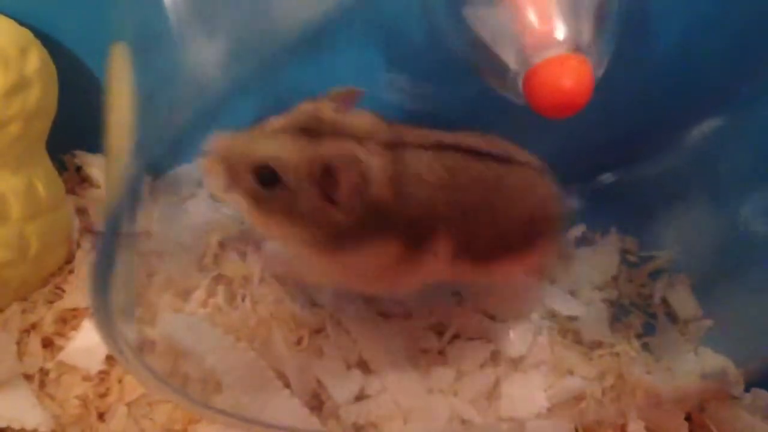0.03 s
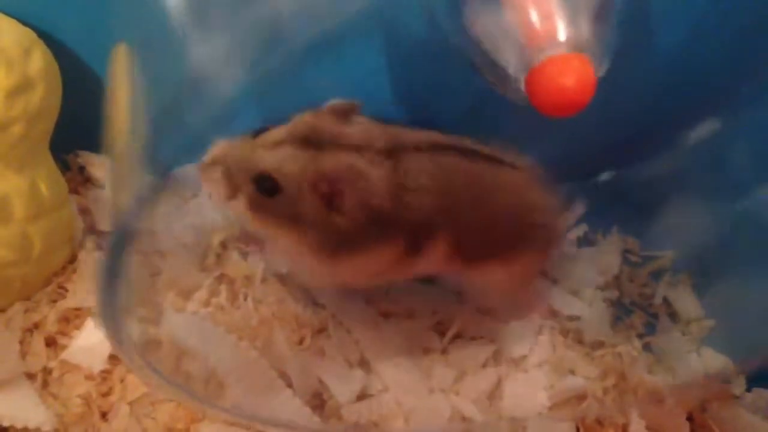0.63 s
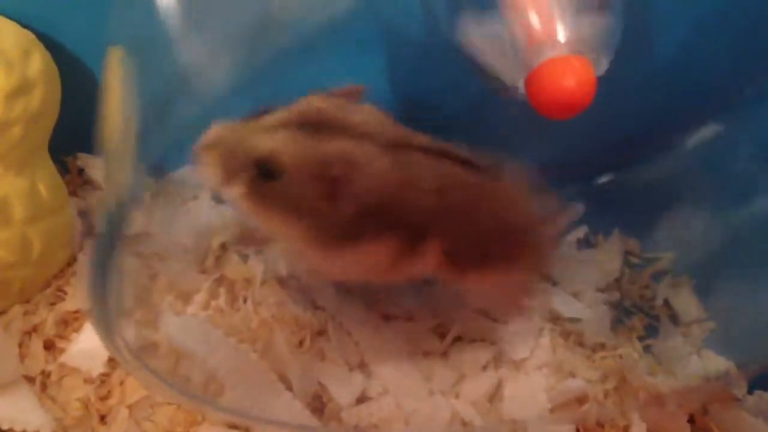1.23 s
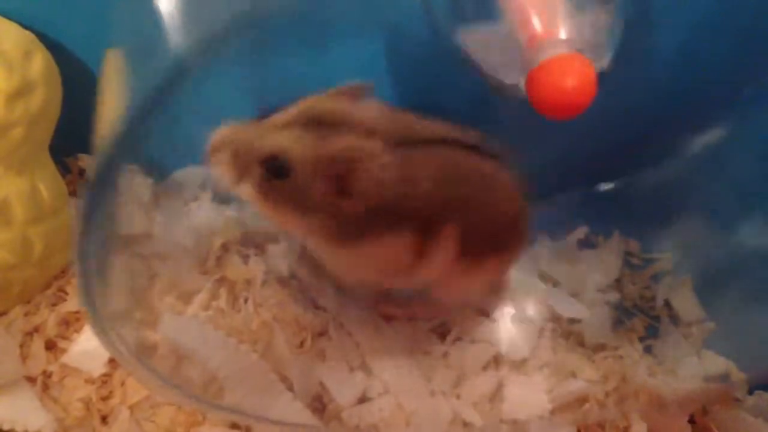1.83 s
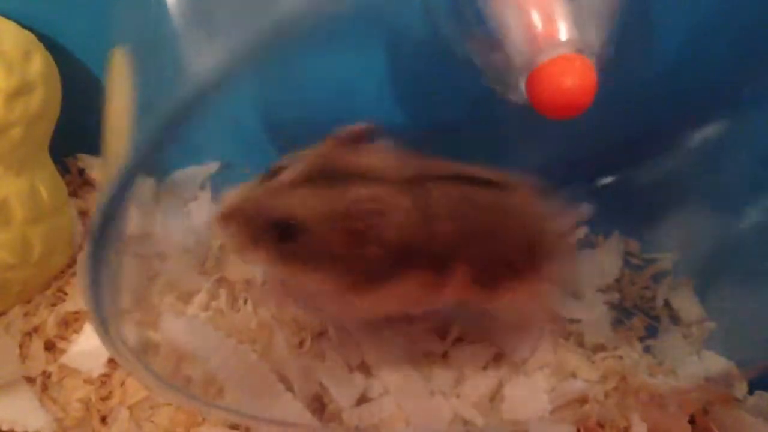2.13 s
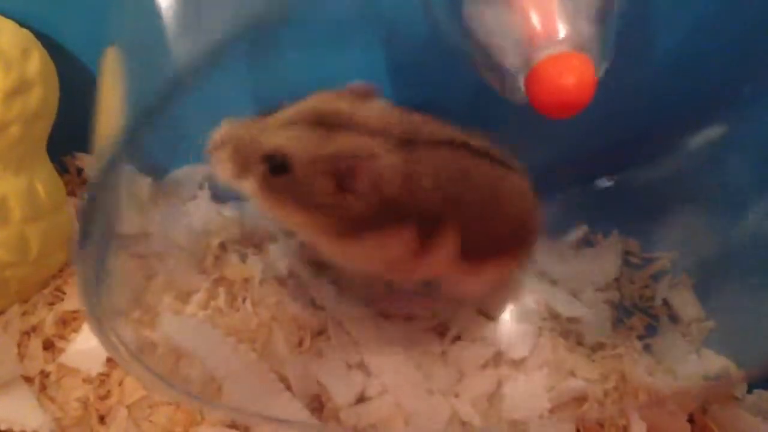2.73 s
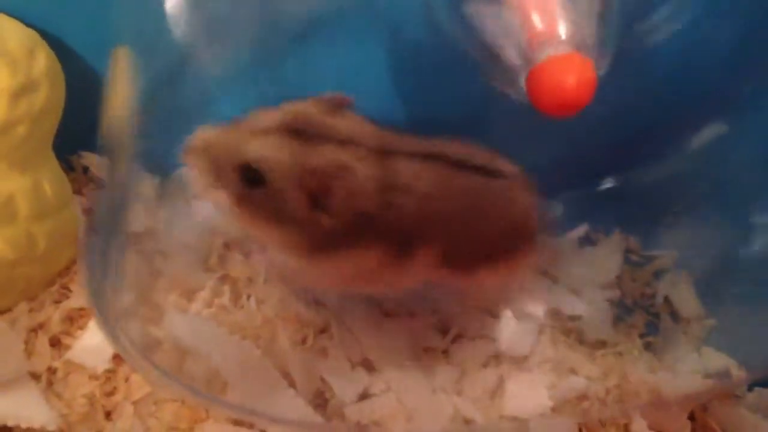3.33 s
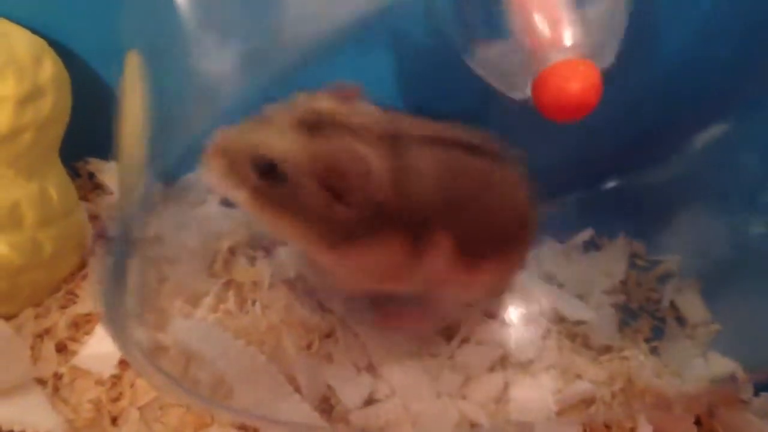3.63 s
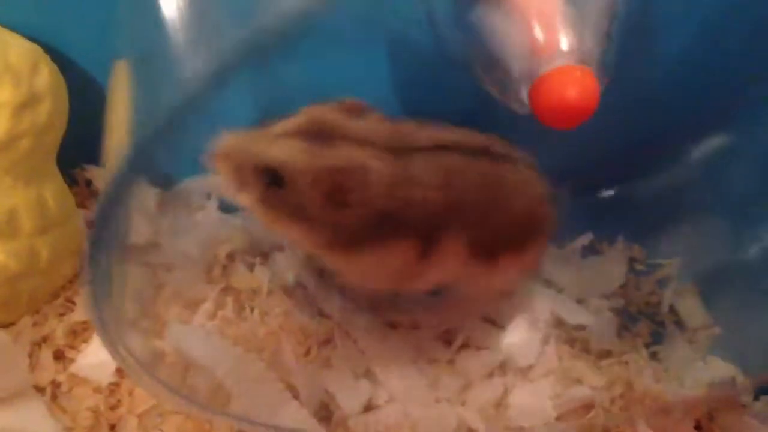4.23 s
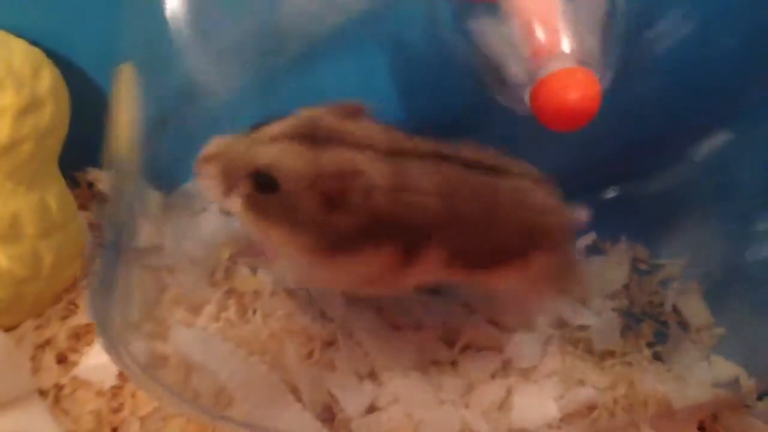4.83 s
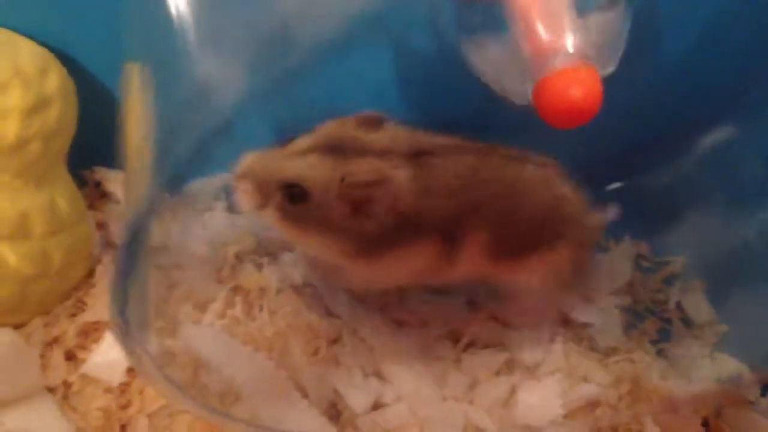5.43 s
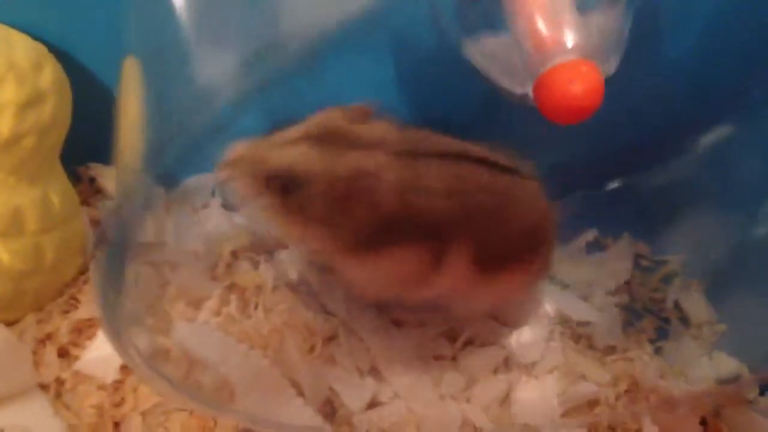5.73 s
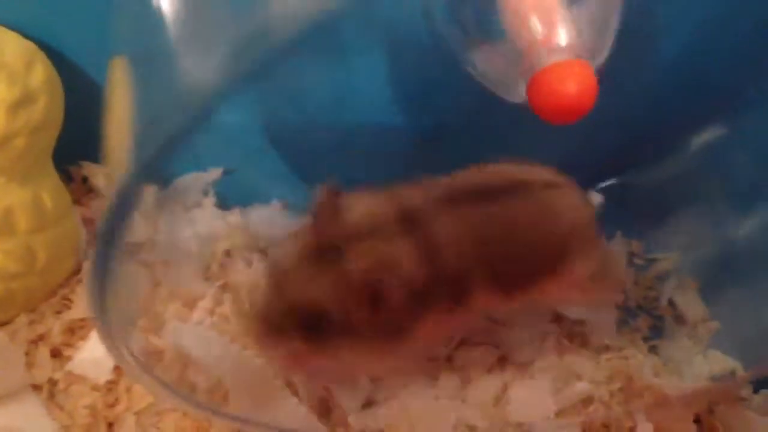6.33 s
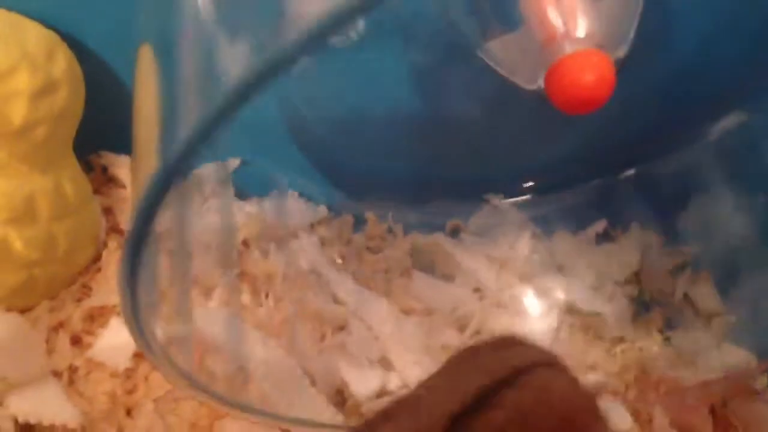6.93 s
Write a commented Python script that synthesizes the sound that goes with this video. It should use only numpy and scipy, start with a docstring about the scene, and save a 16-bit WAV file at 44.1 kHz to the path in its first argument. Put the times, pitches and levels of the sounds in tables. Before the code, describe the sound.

A hamster runs in a rattling plastic wheel with quick thuds and brief axle squeaks, then slows to a stop.

```python
"""A hamster runs in a plastic wheel inside its cage, close by, in a quiet room.
From the start, each quick step thuds on the drum and throws the loose hub against the axle, while
the drum rumbles, the dry axle chirps and scrapes, claws scuff and tick, and bedding rustles.
From about halfway, shavings slide twice. Near the end the axle groans softly as the wheel slows;
the steps stop, and the wheel comes to rest over the room's faint hush."""
import sys
import numpy as np
from scipy import signal
from scipy.io import wavfile
from scipy.ndimage import uniform_filter1d

SR = 44100
rng = np.random.default_rng(int(sys.argv[2]) if len(sys.argv) > 2 else 0)


def store_wav(level_fs):
    """Save 16-bit WAV to argv[1]."""
    pcm = np.round(np.clip(np.atleast_2d(level_fs), -1, 1) * 32767)
    wavfile.write(sys.argv[1], SR, pcm.T.astype(np.int16))


N = 317079
TIME = np.arange(N) / SR
RATTLE_TRIM_DB = -4

# The turning wheel. Each row: time in seconds, relative levels of drum rumble and axle rattle in dB.
WHEEL_LEVELS = [(0, -25, -21), (0.08, -40, -48), (0.13, -29.5, -38), (0.85, -28, -37), (1.04, -37.5, -41),
                (1.2, -29, -37), (2.52, -29, -40), (2.61, -40, -41), (2.76, -27, -39), (2.92, -28, -39),
                (3.2, -31.5, -38.5), (3.42, -30, -38.5), (3.8, -30, -37.5), (4.68, -29, -38.5),
                (4.81, -35.5, -42), (4.9, -30.5, -38.5), (5.02, -32.5, -44), (5.3, -26.5, -35),
                (5.5, -36.5, -43), (5.92, -26.5, -36.5), (6.17, -34, -41), (6.28, -32.5, -40.5),
                (6.6, -28, -38), (6.84, -36.5, -45.5), (7.08, -42, -58), (7.19, -53, -67)]
# The drum's low body response. Each row: frequency in Hz, gain in dB.
DRUM_SPECTRUM = [(40, -22), (85, -42.5), (105, -19.5), (130, 0.5), (170, 1.5), (215, 1.5), (275, 3.5),
                 (315, 0), (370, -9.5), (420, -6), (560, -11), (680, -18.5), (1200, -22.5), (2000, -55.5)]
# The plastic's midrange response to small contacts. Each row: frequency in Hz, gain in dB.
WALL_SPECTRUM = [(60, -65), (300, -0.5), (550, -2.5), (780, 1), (1200, -0.5), (2200, -11), (3500, -17.5),
                 (5200, -18.5), (6600, -43), (8000, -38), (15000, -47)]


def hub_knocks(blows, rise_s=0.0024, chatter_s=0.0035, seat_s=0.0012, size=4096):
    """Impact excitation: the hub seats on the axle with a crack and a brief note; the wheel rings on."""
    # Each row: frequency in Hz, gain of the crack in dB.
    crack_spectrum = [(60, -40), (200, -34), (600, -0.5), (1100, 3.5), (1550, 3.5), (1900, -1.5),
                      (2200, 5.5), (2420, -10), (2650, 4), (2950, -8), (3400, -1), (4200, -17.5),
                      (5300, -14), (7000, -37), (15000, -47)]
    out, t, colour = np.zeros(N), TIME[:size], response(crack_spectrum)
    for s, db, hz, crack_db in blows:
        rise = rise_s * np.exp(0.33 * rng.uniform(-1.16, 1))
        hub = swell(t, rise) * np.sin(2 * np.pi * hz * t)
        note = peaked(hub + amp(-3) * peaked(wheel_ring(vary_db=6.0)))
        crack = burst(colour, chatter_s, size) * (1 - np.exp(-t / seat_s))
        add(out, s, amp(db) * (amp(-2.5) * note + amp(crack_db - 1) * crack))
    return out


def hub_blows(step_db=-29, spread_db=5, hub_hz=1484, spread_hz=86, rebound_s=0.029):
    """Inelastic collision: steps throw the hub, alternate ones harder, and it rebounds more softly."""
    # Prominent knocks. Each row: start in seconds, level in dB, pitch in Hz, crack emphasis in dB.
    loud_knocks = [(0.044, -22, 1463, -5), (0.194, -21, 1530, -9), (0.2688, -13.5, 1465, -26),
                   (0.3438, -9.5, 1463, -6.5), (0.3675, -18.5, 1500, -27), (0.4234, -12.5, 1520, -5),
                   (0.446, -21.5, 1426, -14), (0.502, -25, 1560, -14), (0.5700, -15, 1475, -2),
                   (0.587, -18.5, 1540, -14), (0.7183, -17, 1486, -23), (0.7517, -17, 1583, -6),
                   (0.7953, -23, 1460, 6), (0.808, -19.5, 1490, -13), (0.8661, -16, 1500, -10),
                   (1.1213, -19, 1540, -9), (1.1938, -17, 1474, -4), (1.218, -18.5, 1540, -18),
                   (1.342, -16.5, 1520, -7), (1.4125, -20, 1634, -7), (1.4775, -23.5, 1464, -3),
                   (1.489, -16.5, 1484, -12), (1.527, -21, 1544, -15), (1.582, -17.5, 1405, -14),
                   (1.6413, -17.5, 1470, -10), (1.8866, -16, 1465, -8), (1.952, -19.5, 1560, 1.5),
                   (1.976, -18.5, 1530, -3), (2.098, -17, 1533, -12), (2.2451, -17, 1440, -12),
                   (2.2837, -17, 1540, -10), (2.339, -18, 1505, -31), (2.478, -19.5, 1484, -14),
                   (2.646, -23, 1430, -19), (2.7896, -18.5, 1500, -4), (2.899, -22.5, 1420, -10),
                   (3.004, -21, 1516, -15), (3.039, -14.5, 1544, -15), (3.0871, -16.5, 1440, -3),
                   (3.1014, -12, 1530, -32), (3.237, -5, 1502, -2), (3.3875, -15.5, 1460, -3.5),
                   (3.4805, -14, 1600, -28), (3.5445, -14.5, 1490, -21), (3.58, -20.5, 1565, -18),
                   (3.6182, -14, 1520, -12), (3.688, -20.5, 1540, -13), (3.762, -9.5, 1476, -25),
                   (3.7942, -14.5, 1600, -19), (3.8425, -16, 1483, -6.5), (3.908, -24, 1520, -4),
                   (3.9866, -8.5, 1540, -6.5), (4.083, -20, 1475, -22), (4.1392, -14.5, 1467, -10),
                   (4.2947, -19, 1530, 2.5), (4.366, -17, 1514, -7.5), (4.4365, -15, 1507, -5.5),
                   (4.456, -25, 1500, -22), (4.513, -18.5, 1390, -22), (4.543, -15, 1553, -29),
                   (4.587, -13, 1536, -3.5), (4.656, -18, 1530, -24), (4.7372, -7, 1439, -7),
                   (4.8335, -18.5, 1450, -23), (4.90, -22, 1410, -4), (5.1279, -16, 1563, -5),
                   (5.2258, -14, 1527, -32), (5.2753, -8.5, 1524, -29), (5.3525, -18.5, 1475, -10),
                   (5.424, -25.5, 1454, -10), (5.533, -21.5, 1526, -10), (5.9577, -10.5, 1455, -0.5),
                   (6.1115, -21.5, 1505, -11), (6.1945, -23, 1534, -9), (6.2695, -14, 1450, -3.5),
                   (6.289, -26, 1510, -13), (6.448, -22, 1495, -24), (6.496, -24, 1540, 11),
                   (6.566, -29, 1500, 4), (6.8456, -25.5, 1530, -2), (6.908, -33, 1450, -20),
                   (6.991, -48, 1480, -6), (7.082, -44, 1500, -1)]
    light = []
    for k, s in enumerate(steps()):
        softness, crack, late, rebound_softness, tuning = np.clip(rng.standard_normal(5), -2, 2)
        db = step_db + effort(s) + (-1) ** k
        hz = hub_hz + spread_hz * tuning
        light.append((s, db - spread_db * softness, hz, -11 + 5 * np.tanh(crack)))
        light.append((s + rebound_s + 0.007 * late, db - 5 - spread_db * rebound_softness, hz, -18))
    return among(loud_knocks, light)


def wheel_ring(vary_db, detune_hz=14, build_s=0.0047, size=4096):
    """Modal superposition: each contact point weights and tunes the wheel's damped modes differently."""
    # Each row: frequency in Hz, relative level in dB, 60 dB decay time in seconds.
    wheel_modes = [(569.5, -0.5, 0.059), (926, 3, 0.028), (1427, 22.5, 0.016), (1470, 18.5, 0.025),
                   (1500, -19, 0.16), (1588, 4, 0.042), (2135, -6, 0.023), (2663, 5.5, 0.027),
                   (3280, -7.5, 0.056), (4305, -10, 0.026), (4900, -30.5, 0.011), (6470, -29, 0.059)]
    hz, db, t60 = np.transpose(wheel_modes)[:, :, None]
    t = TIME[:size]
    hz = hz + detune_hz * rng.standard_normal(hz.shape)
    envelopes = amp(db + vary_db * rng.standard_normal(hz.shape)) * np.exp(-np.log(1000) * t / t60)
    modes = envelopes * np.sin(2 * np.pi * (hz * t + rng.random(hz.shape)))
    return modes.sum(0) * (1 - np.exp(-t / build_s))


def paw_thuds(step_db=-27, spread_db=1.5, lag_s=0.01209, scatter_s=0.018, pitch_hz=(200, 305)):
    """Soft impact excites low modes: each paw lands on a different panel of the drum."""
    # The heaviest landings. Each row: start in seconds, relative level in dB, pitch in Hz.
    heavy_paws = [(0.117, -14.5, 187), (0.194, -18, 279), (0.231, -20.5, 282), (0.271, -14.5, 221),
                  (0.349, -15, 176), (0.483, -22.5, 225), (0.539, -25, 313), (0.61, -21, 242),
                  (0.755, -19, 267), (0.991, -16, 278), (1.485, -17.5, 273), (1.529, -23, 253),
                  (1.612, -22.5, 312), (1.716, -18.5, 300), (1.753, -23, 244), (2.062, -21.5, 294),
                  (2.134, -17.5, 298), (2.476, -19.5, 221), (2.511, -19.5, 269), (2.716, -22, 256),
                  (2.825, -13.5, 274), (2.889, -22, 240), (2.929, -24, 300), (2.986, -27, 300),
                  (3.042, -23.5, 240), (3.113, -16.5, 173), (3.391, -18.5, 187), (3.421, -14.5, 193),
                  (3.679, -20.5, 382), (3.70, -20.5, 263), (3.757, -24, 275), (3.78, -24, 220),
                  (3.868, -12.5, 207.4), (4.021, -26, 260), (4.105, -21, 270), (4.18, -19, 193),
                  (4.328, -18, 270), (4.445, -19, 280), (4.507, -21.5, 307), (4.619, -14.5, 271),
                  (4.855, -21.5, 203), (4.897, -15.5, 197), (5.096, -22.5, 265), (5.551, -21, 268),
                  (5.702, -22.5, 165), (5.778, -18.5, 265), (5.802, -20.5, 260), (5.90, -15, 191),
                  (5.951, -20, 273), (6.226, -17, 248), (6.273, -16.5, 190), (6.53, -18, 203),
                  (6.557, -19.5, 264), (6.745, -20.5, 256)]
    light = []
    for s in steps():
        start = s + lag_s + scatter_s * rng.standard_normal()
        db = step_db + effort(s) + spread_db * rng.standard_normal()
        light.append((start, db, rng.uniform(*pitch_hz)))
    return amp(-2) * panel_strikes(among(heavy_paws, light), DRUM_SPECTRUM, rise_s=0.0059,
                                   damping=1.58, shake_db=0.5, shake_s=0.012)


def wall_clacks(step_db=-34, spread_db=2, scatter_s=0.018, low_hz=545, high_hz=900, share=0.45):
    """Plate resonance: some steps also clack the drum's wall, near one of its two notes."""
    # The clearest clacks. Each row: start in seconds, relative level in dB, pitch in Hz.
    clear_clacks = [(0.194, -28, 497), (0.268, -21.5, 895), (0.344, -21.5, 864), (0.418, -20.5, 976),
                    (0.611, -21.5, 445), (0.64, -27, 520), (0.666, -24.5, 550), (0.791, -20.5, 904),
                    (0.864, -25, 540), (1.309, -23, 577), (1.405, -24, 502), (1.589, -25.5, 570),
                    (1.641, -23.5, 880), (1.945, -21, 1210), (2.161, -21.5, 900), (2.399, -23, 904),
                    (2.476, -24, 600), (2.828, -21.5, 450), (2.898, -22, 555), (2.925, -23, 440),
                    (3.378, -28, 890), (3.655, -22.5, 568), (3.679, -23.5, 890), (4.144, -20.5, 550),
                    (4.178, -25, 507), (4.428, -22, 924), (4.896, -22, 570), (5.166, -24.5, 860),
                    (5.194, -24, 568), (5.423, -22, 900), (5.949, -20.5, 470), (6.563, -25.5, 850)]
    light = []
    for s in steps():
        late, strength, tuning = rng.standard_normal(3)
        chance, note = rng.random(2)
        if chance < share:
            hz = (low_hz if note < 0.5 else high_hz) * (1 + 0.064 * tuning)
            light.append((s + scatter_s * abs(late), step_db + effort(s) + spread_db * strength, hz))
    return amp(-0.5) * panel_strikes(among(clear_clacks, light), WALL_SPECTRUM, rise_s=0.0031,
                                     damping=1.1, shake_db=-1, shake_s=0.0093)


def panel_strikes(strikes, spectrum, rise_s, damping, shake_db, shake_s, size=8192):
    """Damped bending vibration: a foot flexes one panel for a few cycles and shakes the rest."""
    out, t, body = np.zeros(N), TIME[:size], response(spectrum)
    for s, db, hz in strikes:
        panel = swell(t, rise_s) ** damping * np.sin(2 * np.pi * hz * t)
        shake = amp(shake_db) * burst(body, shake_s, size)
        add(out, s, amp(db) * peaked(panel + shake))
    return out


def steps():
    """Quasi-periodic excitation: step times in seconds, about 13 a second with small hesitations."""
    # Each row: time in seconds, steps taken so far.
    gait = [(0.044, 0), (0.868, 11), (1.045, 13), (1.716, 22), (1.882, 24), (2.168, 28), (2.478, 32),
            (2.645, 34), (3.006, 39), (3.912, 51), (4.294, 56), (4.737, 62), (4.83, 63), (5.427, 71),
            (5.525, 72), (6.03, 79), (6.194, 81), (6.57, 86)]
    times, taken = np.transpose(gait)
    return np.interp(np.arange(taken[-1] + 1), taken, times)


def effort(s):
    """Driving strength: how hard the wheel is pushed at time s, in dB over its median."""
    times, _, rattle_db = np.transpose(WHEEL_LEVELS)
    return np.interp(s, times, rattle_db - np.median(rattle_db))


def rolling(blows, places=8):
    """Random impact excitation: the turning drum rumbles and the dry axle rattles it at many places."""
    pressure, wall = axle_load(blows), response(WALL_SPECTRUM)
    rumble = pressure ** 0.78 * evened(through(bumps(per_s=400, spread_db=4), response(DRUM_SPECTRUM)))
    ring = sum(through(bumps(per_s=35, spread_db=5), wheel_ring(vary_db=4.5, detune_hz=31.6))
               for _ in range(places))
    grit = sum(through(bumps(per_s=70, spread_db=-3), burst(wall, decay_s=0.0058, size=2048))
               for _ in range(places))
    rattle = pressure * (amp(-3) * evened(ring) + amp(-6) * patter() + amp(-8.5) * evened(grit))
    rumble_gain = amp(curve(WHEEL_LEVELS, column=1) - 4.5)
    rattle_gain = amp(curve(WHEEL_LEVELS, column=2) + RATTLE_TRIM_DB)
    return rumble_gain * rumble + rattle_gain * rattle


def axle_load(blows, rise_s=0.0033, size=6000):
    """Amplitude modulation by load: pressure on the axle surges after each knock, then eases."""
    surge = np.zeros(N)
    for s, *_ in blows:
        add(surge, s, swell(TIME[:size], rise_s))
    return evened(1 + np.minimum(surge, 1))


def patter(low_hz=450, high_hz=1700, rise_s=0.00078, panels=14, size=1024):
    """Free vibration: light steps and loose chips tap panels, each with its own short note."""
    t = TIME[:size]
    taps = (swell(t, rise_s) * np.sin(2 * np.pi * hz * t) for hz in np.geomspace(low_hz, high_hz, panels))
    return evened(sum(through(bumps(per_s=9, spread_db=7.5), tap) for tap in taps))


def axle_chirps(rasp=0.02, hard_rasp=0.014, overtone_db=-11, hard_db=-24, size=3000):
    """Stick-slip friction: a rough whistle rings the axle; hard slips add overtones and a screech."""
    # Loud once a turn, faint between steps.
    # Each row: start in seconds, peak in dB, first and last pitch in Hz, length in seconds.
    chirps = [(0.311, -15.5, 4460, 4240, 0.014), (0.391, -30, 4830, 4150, 0.017),
              (1.057, -48, 5200, 4300, 0.025), (1.158, -37, 4400, 4150, 0.02),
              (1.632, -45, 5100, 5280, .026), (2.487, -43, 5740, 5340, 0.024),
              (2.682, -23.5, 4640, 4120, 0.017), (2.756, -42.5, 4650, 4420, 0.029),
              (3.31, -41, 4300, 4280, .026), (3.349, -42, 4850, 5050, 0.015),
              (3.431, -24.5, 4440, 4220, 0.013), (3.582, -43, 4300, 4450, 0.03),
              (3.715, -41, 4250, 4520, .028), (4.185, -25, 4345, 4320, 0.013),
              (4.27, -28, 4300, 4240, 0.013), (4.472, -45, 4400, 4570, .028),
              (4.664, -38, 4250, 4440, .028), (5.079, -44, 4650, 4300, 0.049),
              (5.688, -46, 4400, 4550, .028), (6.147, -43.5, 4300, 4360, 0.024),
              (6.354, -42, 4280, 4500, 0.03)]
    # Each row: frequency in Hz, bandwidth in Hz, gain in dB.
    axle_modes = [(4310, 93, 15), (4840, 340, 14.5), (8920, 240, 6.5), (10200, 600, -3), (13080, 380, 4),
                  (14100, 1000, 4)]
    out, t = np.zeros(N), TIME[:size]
    for s, db, start_hz, end_hz, length in chirps:
        jitter, flutter = wander(size, span=30), wander(size, span=30)
        hardness = min(amp(db - hard_db), 1) ** 2
        glide_hz = np.interp(t, [0, length], [start_hz, end_hz])
        phase = 2 * np.pi * np.cumsum(glide_hz * (1 + (rasp + hard_rasp * hardness) * jitter)) / SR
        grip = np.sin(np.pi * np.minimum(t / length, 1)) ** 2
        overtones = amp(overtone_db) * (np.sin(2 * phase) + np.sin(3 * phase))
        slip = grip * (np.sin(phase) + hardness * overtones) * (1 + 0.38 * flutter)
        screech = amp(-3) * hardness * grip * rng.standard_normal(size)
        ring = sum(amp(mode_db) * resonate(slip + resonate(screech, hz, width), hz, width)
                   for hz, width, mode_db in axle_modes)
        add(out, s, amp(db) * peaked(amp(-4) * slip + ring))
    return out


def claw_scuffs(step_db=-35, fade_s=0.0076, scatter_s=0.07, catches_per_s=1400, size=4096):
    """Intermittent friction: a claw's dying run of tiny catches rings the hollow wheel and the spot hit."""
    # Distinct scuffs. Each row: start in seconds, decay time in seconds, peak in dB.
    clear_scuffs = [(0.119, 0.0064, -32), (0.585, 0.014, -30), (1.27, 0.0045, -22.5),
                    (1.567, 0.0088, -30.5), (1.716, 0.0054, -27), (1.781, 0.0034, -30), (2.245, 0.01, -27),
                    (2.927, 0.012, -42), (3.085, 0.0038, -30), (3.393, 0.012, -31), (4.585, .007, -26),
                    (5.42, 0.0052, -28), (5.78, 0.011, -36), (5.872, 0.011, -32), (6.229, 0.023, -26),
                    (6.555, 0.0095, -27.5), (6.612, 0.0067, -39)]
    # Each row: frequency in Hz, gain in dB.
    scuff_spectrum = [(100, -15), (600, 1), (1200, -8.5), (1520, 15), (1900, 4.5), (2200, 5.5), (2400, -4),
                      (2640, 7.5), (2900, -17.5), (3300, -19.5), (3800, -18), (4300, -12), (5400, -13.5),
                      (7000, -35), (15000, -39)]
    out, colour = np.zeros(N), response(scuff_spectrum)
    light = [(s + scatter_s * rng.random(), fade_s, step_db + effort(s))
             for s in steps() for _ in ("fore", "hind")]
    for s, fade, db in among(clear_scuffs, light):
        strengths = amp(3 * rng.standard_normal(size)) * rng.choice([-1, 1], size)
        catches = rng.random(size) < catches_per_s / SR
        force = strengths * catches * np.exp(-TIME[:size] / fade)
        scuff = peaked(through(force, colour))
        hollow = peaked(resonate(force, hz=2665, width_hz=90))
        spot_hz = 1800 * 2 ** rng.random()
        spot = peaked(resonate(resonate(force, spot_hz, width_hz=450), spot_hz, width_hz=450))
        add(out, s, amp(db) * peaked(scuff + amp(-8) * hollow + amp(-9) * spot))
    return out


def axle_scrape(slip_s=0.0049, size=2500):
    """Friction noise: faint, rough slips of the dry axle blur into a thin scrape."""
    # Each row: frequency in Hz, gain in dB.
    scrape_spectrum = [(1500, -15), (2100, 3.5), (2700, 15), (3600, -4.5), (4050, 7), (4290, 18.5),
                       (4520, -4.5), (5300, 6), (6000, -9.5), (6400, 0.5), (6900, -31), (9000, -19)]
    # The scrape gains as the wheel begins to slow. Each row: time in seconds, dB relative to the rattle.
    drag = [(0, -13), (4.9, -10), (5.7, -10), (6.6, -12.5), (6.9, -14)]
    slips = through(abs(bumps(per_s=85, spread_db=1.5)), swell(TIME[:size], slip_s))
    scrape = through(slips * rng.standard_normal(N), response(scrape_spectrum))
    return amp(curve(WHEEL_LEVELS, column=2) + RATTLE_TRIM_DB + curve(drag, column=1)) * evened(scrape)


def claw_ticks(faint_db=-45, spread_db=3, count=18, scratch_s=0.0039, size=2048):
    """Brief, hard contact gives a bright spectrum: claws and chips tick on the plastic."""
    # The sharpest ticks. Each row: start in seconds, relative level in dB.
    sharp_ticks = [(1.1596, -28.5), (1.6874, -29.5), (2.4434, -34.5), (2.826, -39), (3.2, -32),
                   (3.7639, -37), (3.9514, -33.5), (4.7017, -29), (5.8391, -36), (6.496, -40), (6.844, -42)]
    # Each row: frequency in Hz, gain in dB.
    tick_spectrum = [(100, -46), (500, -46), (2000, 14.5), (4300, 11), (6200, 6), (7500, -8), (9800, 0.5),
                     (11500, -12), (15000, -11)]
    out, colour = np.zeros(N), response(tick_spectrum)
    faint = [(s, faint_db + spread_db * rng.standard_normal()) for s in rng.permutation(steps())[:count]]
    for s, db in among(sharp_ticks, faint):
        add(out, s, amp(db + 3) * burst(colour, scratch_s, size))
    return out


def axle_groans(waver=0.11, sag=0.2, sag_s=0.031):
    """Friction-driven oscillation: the slowing axle's low judder swells, sags in pitch and fades."""
    # Each row: start in seconds, length in seconds, level in dB, settled pitch in Hz.
    groans = [(5.955, 0.092, -28, 147.6), (6.06, 0.12, -30.5, 151), (6.846, 0.1, -39, 117.7),
              (7.002, 0.12, -40, 126.4)]
    out = np.zeros(N)
    for s, length, db, settled_hz in groans:
        t = TIME[TIME < length]
        wobble = wander(N, span=400)[:len(t)]
        hz = settled_hz * (1 + sag * np.exp(-t / sag_s) + waver * wobble)
        judder = evened(np.sin(2 * np.pi * np.cumsum(hz) / SR))
        add(out, s, amp(db) * np.sin(np.pi * t / length) * judder)
    return out


def sliding_shavings(ramp_s=0.052):
    """Sliding friction: loose shavings cross the plastic with a short, soft hiss."""
    # Each row: start in seconds, length in seconds, level in dB.
    slides = [(3.52, 0.26, -56), (4.715, 0.19, -49)]
    # Each row: frequency in Hz, gain in dB.
    hiss_spectrum = [(1500, -11), (3800, 7), (5500, -4), (8300, -6), (10000, -10.5), (15000, -17)]
    level = sum(amp(db) * np.clip(np.minimum(TIME - s, s + length - TIME) / ramp_s, 0, 1)
                for s, length, db in slides)
    return level * coloured_noise(hiss_spectrum)


def bedding_rustle(level_db=-65, follow=0.7):
    """Incoherent summation: countless tumbling crumbs merge into a rustle that dies as the drum slows."""
    # Each row: frequency in Hz, gain in dB.
    crumb_spectrum = [(1000, -25), (4000, 9.5), (7500, -1.5), (15000, -3.5)]
    return amp(level_db + follow * effort(TIME)) * coloured_noise(crumb_spectrum)


def radiate(x, cutoff_hz=106):
    """Radiation efficiency: plastic parts much smaller than the wavelength send out little deep bass."""
    return signal.sosfilt(signal.butter(6, cutoff_hz, btype="high", fs=SR, output="sos"), x)


def cage_reverb(x, wet_db=-13, t60=0.077, delay_s=0.003, dull_hz=6000, size=12000):
    """Reverberation: quick, dense reflections from cage and room, their treble absorbed by bedding."""
    t = TIME[:size]
    taps = rng.standard_normal(size) * np.exp(-np.log(1000) * t / t60) * (t > delay_s)
    dulled = signal.lfilter(*signal.butter(2, dull_hz, fs=SR), taps / np.linalg.norm(taps))
    return x + amp(wet_db) * through(x, dulled)


def room_hush(level_db=-59):
    """Stationary noise: the quiet room's faint hush, strongest in the bass."""
    # Each row: frequency in Hz, gain in dB.
    room_spectrum = [(20, 13.5), (60, 17), (140, 23.5), (400, 9), (1000, -3), (3000, 1.5), (7000, -6.5),
                     (15000, -7)]
    return amp(level_db) * coloured_noise(room_spectrum)


def among(prominent, light, before_s=0.035, after_s=0.018):
    """The prominent events, and those light ones that do not crowd them."""
    return prominent + [row for row in light
                        if not any(s - before_s < row[0] < s + after_s for s, *_ in prominent)]


def bumps(per_s, spread_db):
    """Poisson process: a random train of small impacts of uneven size."""
    strengths = amp(spread_db * np.minimum(rng.exponential(1, N), 3))
    return strengths * rng.choice([-1, 1], N) * (rng.random(N) < per_s / SR)


def burst(colour, decay_s, size):
    """Exponential decay: a dying chatter of contacts through a body, peak 1."""
    return peaked(through(rng.standard_normal(size) * np.exp(-TIME[:size] / decay_s), colour))


def swell(t, rise_s):
    """Critically damped envelope of a blow: it peaks at the rise time, then dies."""
    return t / rise_s * np.exp(1 - t / rise_s)


def resonate(x, hz, width_hz):
    """Resonance: one ringing mode, gain 1 at its centre."""
    return signal.lfilter(*signal.iirpeak(hz, hz / width_hz, fs=SR), x)


def wander(size, span):
    """Random fluctuation: noise averaged over span samples, rms 1."""
    return evened(uniform_filter1d(rng.standard_normal(size), size=span))


def coloured_noise(spectrum):
    """Spectral shaping: white noise filtered to the given spectrum, rms 1."""
    return evened(through(rng.standard_normal(N), response(spectrum)))


def response(spectrum, size=4096):
    """Minimum phase: the causal impulse response with the given spectrum."""
    hz, db = np.transpose(spectrum)
    bin_hz = abs(np.fft.fftfreq(size, 1 / SR))
    log_gain = np.log(amp(np.interp(np.log(bin_hz + 1), np.log(hz), db)))
    return np.fft.ifft(np.exp(np.conj(signal.hilbert(log_gain)))).real


def through(x, impulse_response):
    """Convolution: a signal played through a linear system."""
    return signal.fftconvolve(x, impulse_response)[:len(x)]


def add(mix, s, sound):
    """Superposition: adds a sound to the mix at time s."""
    part = mix[max(round(s * SR), 0):][:len(sound)]
    part += sound[:len(part)]


def curve(rows, column):
    """Linear interpolation of one column of a table in time."""
    columns = np.transpose(rows)
    return np.interp(TIME, columns[0], columns[column])


def amp(db):
    """Decibels to gain."""
    return 10 ** (np.asarray(db) / 20)


def evened(x):
    """Scales to rms 1."""
    return x / np.sqrt(np.mean(x ** 2) + 1e-20)


def peaked(x):
    """Scales to peak 1."""
    return x / (abs(x).max() + 1e-20)


def scene():
    """Superposition: wheel and animal sound together in the cage, over the room's hush."""
    blows = hub_blows()
    footfalls = paw_thuds() + wall_clacks()
    wheel = hub_knocks(blows) + footfalls + rolling(blows)
    wheel += claw_scuffs() + axle_chirps() + axle_scrape() + claw_ticks()
    wheel += bedding_rustle() + axle_groans() + sliding_shavings()
    return (cage_reverb(radiate(wheel)) + room_hush())[None]


def record(dry):
    """Band limiting: a steep low-pass filter removes the highest treble."""
    cutoff_hz = 15380
    lowpass = signal.firwin(511, cutoff_hz, window=("kaiser", 9), fs=SR)
    return signal.oaconvolve(dry, lowpass[None], "same")


dry = scene()
out = record(dry)
store_wav(out)
```